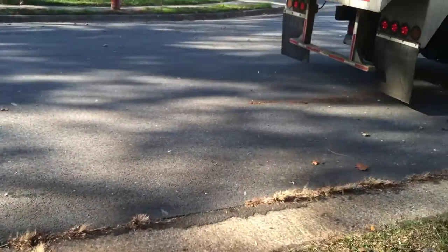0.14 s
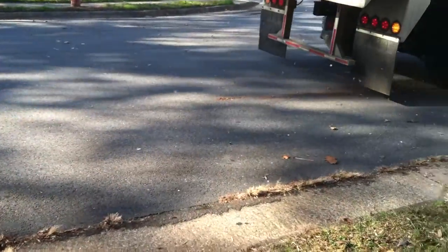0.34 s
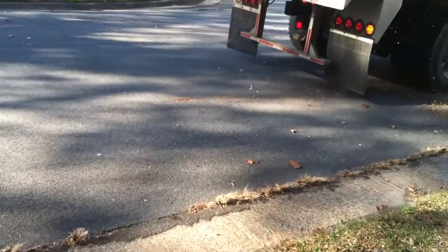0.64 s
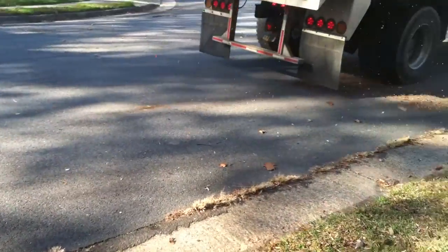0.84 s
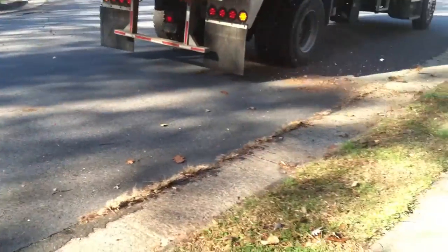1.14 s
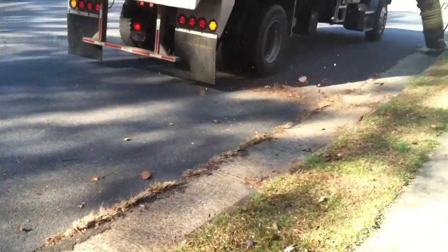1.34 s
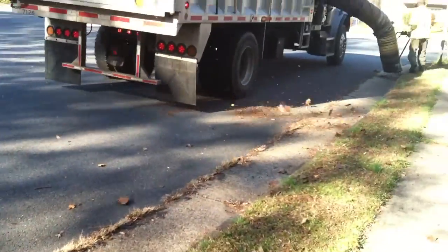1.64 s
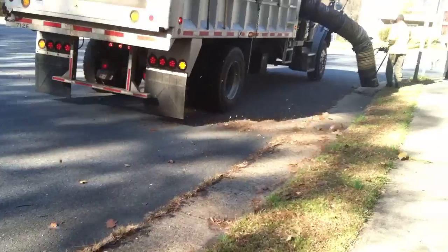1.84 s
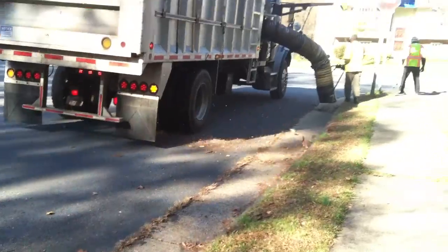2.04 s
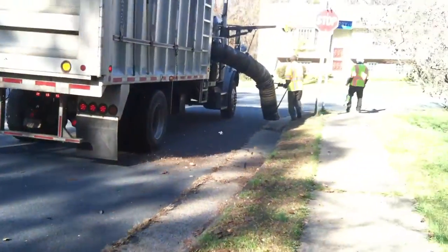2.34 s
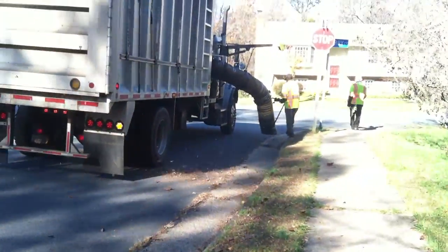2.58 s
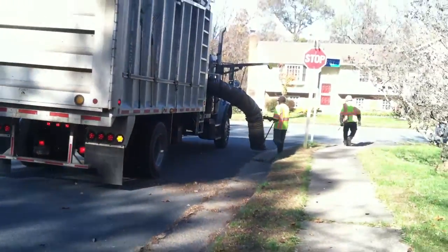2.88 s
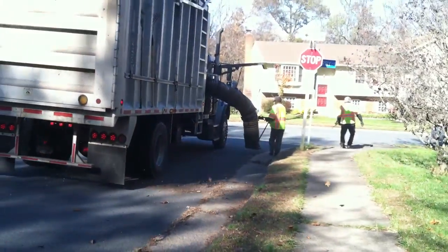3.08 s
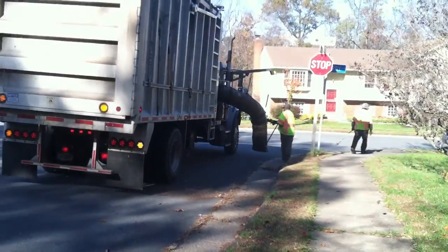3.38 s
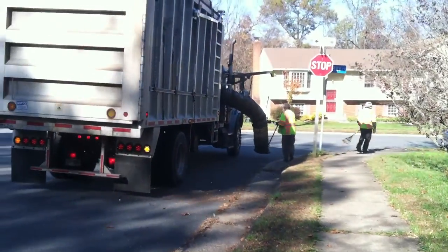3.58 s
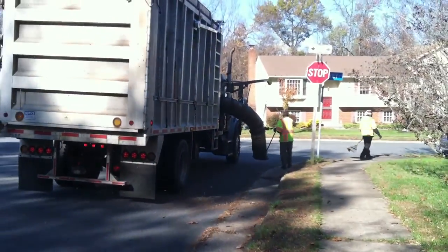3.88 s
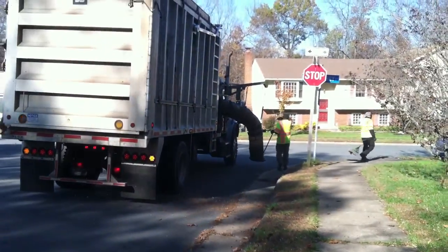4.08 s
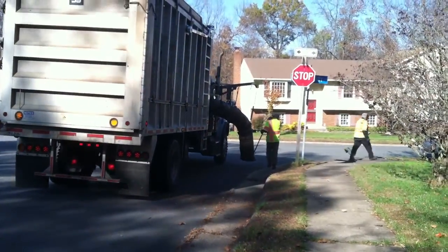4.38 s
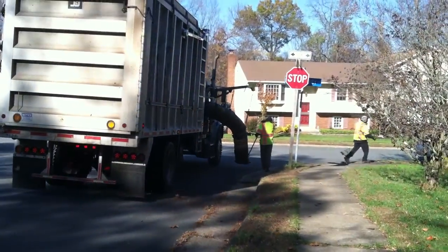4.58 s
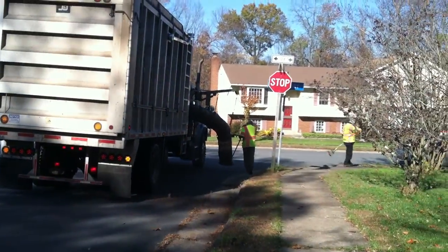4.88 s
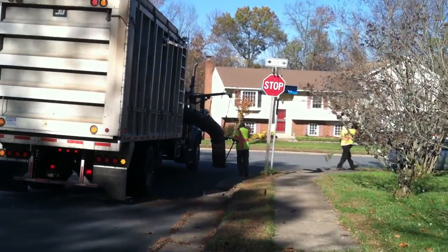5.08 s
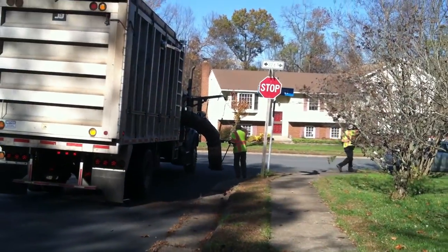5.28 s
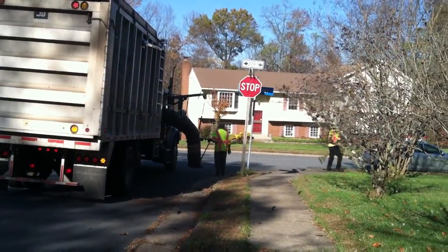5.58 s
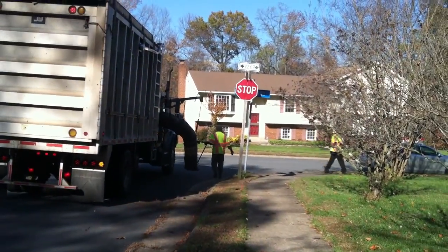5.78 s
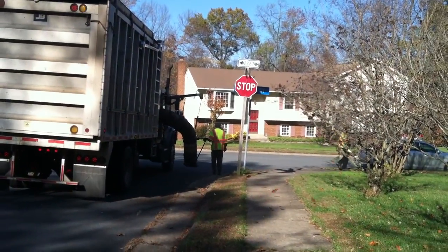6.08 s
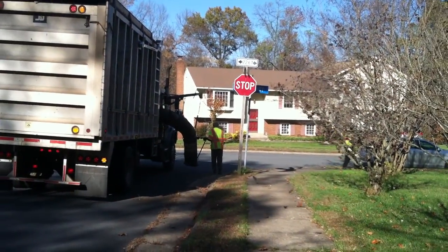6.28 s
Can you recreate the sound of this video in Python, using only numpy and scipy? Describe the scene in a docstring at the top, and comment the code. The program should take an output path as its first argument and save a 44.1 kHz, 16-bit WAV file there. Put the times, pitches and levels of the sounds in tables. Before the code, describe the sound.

The loud suction fan and diesel engine of a leaf vacuum truck hum and roar, easing slightly as it creeps away.

```python
"""At a street kerb, a truck-mounted leaf vacuum is at work. Six impeller blades chop the air into a
drone, the diesel fires at about a third of that pitch, turbulent air excites the resonances of hose
and box, and leaves hiss in bursts. Grit ticks on metal and a brake squeaks faintly. The listener
turns while the truck creeps away, so tones and resonances wax and wane."""
import sys
import numpy as np
from scipy import signal
from scipy.fft import rfft, irfft, next_fast_len
from scipy.io import wavfile
from scipy.ndimage import uniform_filter1d, map_coordinates

SR = 44100
rng = np.random.default_rng(int(sys.argv[2]) if len(sys.argv) > 2 else 0)


def int16_out(signal):
    """Quantize to a 16-bit WAV file."""
    q = np.round(np.clip(np.atleast_2d(signal).T, -1, 1) * 32767)
    wavfile.write(sys.argv[1], SR, q.astype(np.int16))


N = 283560
TIME = np.arange(N) / SR
FRAME = 1024


def amp(db):
    return 10 ** (np.asarray(db) / 20)


def unit(x):
    return x / np.sqrt(np.mean(x ** 2) + 1e-20)


def curves(rows, t=TIME):
    """Linear interpolation in time of each column after the first."""
    times, *columns = np.transpose(rows)
    return [np.interp(t, times, column) for column in columns]


def wobble(rate):
    """Smooth random modulation: a spline with rate knots a second."""
    coarse = np.arange(0, N + 64, 64)
    knots = rng.standard_normal(int(N * rate / SR) + 4)
    return np.interp(np.arange(N), coarse, map_coordinates(knots, [coarse * rate / SR]))


def peak(hz, centre, width):
    """Steep resonance curve, falling to a quarter at centre +/- width."""
    return 1 / (1 + ((hz - centre) / width) ** 2) ** 2


def filtered(x, gain):
    """Zero-phase filtering by gain(f); mirrored ends prevent clicks."""
    x = np.pad(x, [(0, 0)] * (x.ndim - 1) + [(FRAME, FRAME)], "reflect")
    size = next_fast_len(N + 4 * FRAME)
    return irfft(rfft(x, size) * gain(np.fft.rfftfreq(size, 1 / SR)), size)[..., FRAME:FRAME + N]


def rush(gain, patchy_db):
    """Turbulent noise of rms 1, shaped by gain(f, t), in patches of random strength."""
    hz, t, spectrum = signal.stft(rng.standard_normal(N), SR, nperseg=FRAME)
    patches = uniform_filter1d(rng.standard_normal(spectrum.shape), size=8, axis=0)
    patches = unit(uniform_filter1d(patches, size=6, axis=1))
    shaped = spectrum * gain(hz[:, None], t) * amp(patchy_db * patches)
    return unit(signal.istft(shaped, nperseg=FRAME)[1][:N])


def harmonics(hz, partials, drift_hz, waver_db):
    """Harmonic series of an unsteady rotation; each (harmonic, level/dB) wavers on its own."""
    phase = 2 * np.pi * np.cumsum(hz + drift_hz * wobble(1.66)) / SR
    return sum(np.sqrt(2) * amp(db + waver_db * (wobble(9) + 0.73 * wobble(35)))
               * np.sin(k * phase + rng.uniform(0, 2 * np.pi)) for k, db in partials)


def fading_db(depth_db=4, per_s=4.5):
    """Destructive interference: street echoes weaken a tone at random moments."""
    return -depth_db * wobble(per_s) ** 2


# The listener's turn: t/s, fraction completed
TURN_PROGRESS = [(.6, 0), (1.1, 0.12), (1.5, 0.38), (1.85, 0.66), (2.1, .88), (2.6, 0.98), (6.43, 1)]

def turned(before, after, t, lateness=1):
    """Interpolation along the turn; a lateness above 1 delays the change."""
    return before + (after - before) * np.clip(curves(TURN_PROGRESS, t)[0], 0, 1) ** lateness


# Low blade harmonics: t/s, level/dB of harmonics 1, 2 and 4
BLADE_LEVELS = [(0, -24, -39, -42), (.5, -23.5, -35, -41), (.75, -22.5, -36, -38), (1.1, -21.5, -39, -34),
                (1.4, -23.5, -42, -43), (1.8, -22, -40, -54), (2, -22, -30, -50), (2.2, -23, -28, -48),
                (2.35, -27, -44, -36), (2.6, -33, -29, -35), (2.85, -45, -28, -46), (3, -38, -31, -47),
                (3.15, -35, -26, -43), (3.3, -36, -23.5, -38), (3.45, -35, -26, -35), (3.6, -30, -30, -36),
                (3.75, -29, -30, -45), (4, -25, -34, -44), (4.35, -26, -32, -50), (4.6, -27, -31, -47),
                (4.9, -31, -34, -38), (5.25, -29, -33, -43), (5.45, -26, -32, -38), (5.8, -26.5, -37, -40),
                (6.1, -26, -32, -40), (6.43, -25.5, -37, -34)]
# Fading overtones: harmonic, level/dB before the turn, level/dB after
BLADE_OVERTONES = [(3, -38, -47), (5, -45, -44), (6, -43, -45), (7, -47, -47)]
# Brief swells of those overtones: harmonic, t/s, gain/dB
BLADE_SURGES = [(6, .35, 6), (5, .8, 8), (6, 2.15, 7), (5, 3.3, 5), (7, 4.05, 7), (6, 4.4, 2), (3, .35, 4),
                (3, 1.4, 8), (3, 2.08, 9), (3, 3.2, 3), (3, 6, 3), (6, 3.45, 5), (5, 5.1, 3)]
# Faint top overtones: harmonic, level/dB
BLADE_TOP = [(8, -55), (9, -58), (10, -62)]

def impeller(blade_hz=226.35, surge_s=0.19):
    """Periodic chopping of the air radiates harmonics of the blade-passing frequency."""
    first, second, fourth = curves(BLADE_LEVELS)
    upper = []
    for k, before, after in BLADE_OVERTONES:
        surge_db = sum(db * np.exp(-((TIME - at) / surge_s) ** 2)
                       for harmonic, at, db in BLADE_SURGES if harmonic == k)
        flutter_db = (0.5 - np.tanh(surge_db / 2)) * fading_db()
        upper.append((k, turned(before, after, TIME) + flutter_db + surge_db))
    partials = [(1, first), (2, second + 1.8 * wobble(14)), (4, fourth), *upper, *BLADE_TOP]
    return harmonics(blade_hz, partials, drift_hz=.06, waver_db=1.1)


# Exhaust overtones: t/s, level/dB of harmonics 2, 4 and 8
EXHAUST_LEVELS = [(0, -42, -34, -36), (.55, -33, -42, -43), (1.1, -35, -41, -39), (1.7, -36, -47, -46),
                  (2.3, -34, -50, -43), (3, -32, -46, -50), (3.6, -35, -46, -55), (4.9, -35, -41, -55),
                  (5.15, -44, -42, -55), (6.43, -45, -42, -58)]
# Weak exhaust overtone: harmonic, level/dB
EXHAUST_WEAK = [(5, -50)]

def diesel(firing_hz=75.7, fundamental_db=-47.2):
    """Periodic exhaust pulses radiate harmonics of the firing frequency."""
    seventh = -40.5 + fading_db()
    second, fourth, eighth = curves(EXHAUST_LEVELS)
    partials = [(1, fundamental_db), (2, second), (4, fourth), (7, seventh), (8, eighth), *EXHAUST_WEAK]
    return harmonics(firing_hz, partials, drift_hz=.03, waver_db=.4)


# Spectrum of the air rushing through the impeller: f/Hz, relative spectral level/dB
ROAR_SPECTRUM = [(45, -25), (95, -9), (140, 6), (200, 6.5), (265, 3), (320, -4), (520, -1), (700, -0.5),
                 (1400, 0), (2300, -5), (2700, -15.5), (3450, -19), (5000, -14.5), (6700, -19), (7700, -25),
                 (8900, -34.5), (12000, -35.5)]

def roar(start_db=-23, start_m=7.7, creep_m_per_s=0.99):
    """Turbulence radiates broadband noise, which weakens by spherical spreading as the truck recedes."""
    f, db = np.transpose(ROAR_SPECTRUM)
    air = rush(lambda hz, t: 1, patchy_db=0.93)
    broad = unit(filtered(air, lambda hz: amp(np.interp(np.log(hz + 1), np.log(f + 1), db))))
    spreading_db = 20 * np.log10(1 + creep_m_per_s * TIME / start_m)
    return amp(start_db - spreading_db) * broad


# Air modes of hose and box, each with one swell or dip:
# f/Hz, width/Hz, level/dB, swell/dB, t/s of the swell, its half length/s
DUCT_MODES = [(195.4, 34.4, -39, 10.5, 0.52, 2.67), (306, 66, -41, 14, 0.29, 0.86),
              (435, 90, -35.5, -19, 1.36, 0.44), (690, 140, -56.5, 25, 1.36, 0.33),
              (374, 36, -49, 16.5, 0.86, 0.49), (510, 83, -51, 17, 2.1, 1.05),
              (1365, 48, -56, 12, 5.1, 1.2), (1253, 39, -52, 14, 3.44, 0.27),
              (253, 28, -58.5, 28, 1.4, 1.6), (327, 14, -56.5, 17, 5.9, 0.87),
              (317, 20, -56, 14, 4.2, 0.59), (400, 35, -49.5, 8.5, 4.5, 1.1), (790, 98, -47.5, 7, 4, 1.1),
              (1013, 160, -57.5, 18.5, 0.33, 1.6)]
# A hollow resonance that sinks as the truck passes: t/s, f/Hz, level/dB
HOLLOW_GLIDE = [(.7, 710, -33), (1.3, 610, -32.5), (1.8, 660, -29), (2.13, 635, -31), (2.22, 510, -32),
                (2.35, 483, -28.5), (2.45, 453, -37), (2.8, 390, -36), (3.4, 400, -25), (3.8, 490, -35),
                (6.43, 496, -36)]

def ducts(throb_db=2, throbs_per_s=40):
    """Forced resonance: the flow excites the enclosed air, which throbs with the uneven load."""
    flow = rush(lambda hz, t: 1, patchy_db=0.93)
    ringing = np.zeros(N)
    for centre, width, db, swell_db, at, half_s in DUCT_MODES:
        level_db = db + swell_db * np.exp(-((TIME - at) / half_s) ** 2)
        level_db += 0.71 * wobble(4.24) + throb_db * wobble(throbs_per_s)
        ringing += amp(level_db) * unit(filtered(flow, lambda hz: peak(hz, centre, width)))
    hollow = rush(lambda hz, t: peak(hz, curves(HOLLOW_GLIDE, t)[0], width=95), patchy_db=-1.0)
    ringing += amp(curves(HOLLOW_GLIDE)[1]) * hollow
    # The ringing carries no deep bass: it falls away steeply below about 125 Hz.
    return filtered(ringing, lambda hz: 1 / np.sqrt(1 + (125 / (hz + 1)) ** 12))


# Low and high hiss bands: f/Hz before the turn, f/Hz after, width/Hz before, after, extra midway
LEAF_BANDS = [(4210, 5500, 1950, 2030, 0), (7400, 9700, 2700, 3000, 2500)]
# Hiss envelope: t/s, level/dB of the low band, level/dB of the high band
LEAF_LEVELS = [(0, -35.5, -42.5), (.3, -35, -42), (.47, -39.5, -45), (.58, -39, -49), (.62, -35.5, -45.5),
               (1.19, -38.5, -45.5), (1.8, -35.5, -43.5), (1.93, -36, -46.5), (2.1, -43, -49.5),
               (2.5, -44, -52.5), (2.57, -47.5, -57), (3.3, -47, -55), (3.7, -54, -60), (6.43, -55, -64)]
# Clumps of leaves: t/s, gain/dB of the low band, gain/dB of the high band
LEAF_CLUMPS = [(.01, -2, 4.4), (.63, 4.5, 5), (.78, 0, 5.2), (.9, 2, 4.4), (1.8, 1, 4.5), (2.35, 8, 6),
               (2.51, 5, 5.2), (3.37, 8, 1.5)]

def leaves(rise_s=0.018, fall_s=0.056):
    """Friction noise of leaves and grit in the hose, shadowed by the truck's body as it draws ahead."""
    def band(hz0, hz1, width0, width1, extra):
        return lambda hz, t: peak(hz, turned(hz0, hz1, t),
                                  turned(width0, width1, t) + extra * np.sin(turned(0, np.pi, t)))

    low_db, high_db = curves(LEAF_LEVELS)
    for at, low_gain_db, high_gain_db in LEAF_CLUMPS:
        burst = np.exp(-np.abs(TIME - at) / np.where(TIME < at, rise_s, fall_s))
        low_db += low_gain_db * burst
        high_db += high_gain_db * burst
    gusts_db = 0.64 * wobble(9.04) + .5 * wobble(28.3)
    low = rush(band(*LEAF_BANDS[0]), patchy_db=1.1)
    high = rush(band(*LEAF_BANDS[1]), patchy_db=1.2)
    return amp(low_db + gusts_db) * low + amp(high_db + 1.2 * gusts_db + 0.58 * wobble(22)) * high


# Grit striking metal: t/s, level/dB before filtering
GRIT_IMPACTS = [(.887, -41.5), (2.35, -47), (3.5, -49), (5.33, -46)]

def grit(rise_s=.003):
    """A brief impact has a broad spectrum: each tick is a soft, bright puff of noise."""
    ticks, t = np.zeros(N + SR), np.arange(FRAME) / SR
    envelope = t / rise_s * np.exp(1 - t / rise_s)
    for at, db in GRIT_IMPACTS:
        ticks[round(at * SR):][:FRAME] += amp(db) * envelope * rng.standard_normal(FRAME)
    return filtered(ticks[:N], lambda hz: peak(hz, centre=10000, width=5500))


# Brake squeaks: t/s, duration/s, f/Hz, level/dB
BRAKE_SQUEAKS = [(3, .03, 13050, -60), (4.78, .04, 8700, -59), (4.912, .075, 11760, -52),
                 (4.98, .045, 11810, -61), (5.96, .33, 8725, -61), (6.35, .08, 8725, -59)]

def brake():
    """Friction-excited vibration: each squeak is one thin tone with soft ends."""
    squeaks = np.zeros(N + SR)
    for at, length, hz, db in BRAKE_SQUEAKS:
        t = np.arange(round(length * SR)) / SR
        envelope = np.sin(np.pi * t / length) ** .3
        squeaks[round(at * SR):][:len(t)] += amp(db) * envelope * np.sin(2 * np.pi * hz * t)
    return squeaks[:N]


def scene():
    """Superposition of all sources in one channel."""
    return (impeller() + diesel() + roar() + ducts() + leaves() + grit() + brake())[None]


# Spectral dips: f/Hz before the turn, f/Hz after, depth/dB before, after, width/Hz, lateness of glide
HOUSING_DIPS = [(2830, 3500, 1, 5.5, 660, 4.5), (6500, 10000, 6, 5, 740, 0.9)]

def housing(x, midway_fill=0.35):
    """Diffraction round the microphone's housing cuts two dips, which partly fill in mid-turn."""
    hz, t, spectrum = signal.stft(x, SR, nperseg=FRAME, boundary="even")
    depth = 1 - midway_fill * np.sin(turned(0, np.pi, t))
    dips_db = sum(turned(db0, db1, t) * depth * peak(hz[:, None], turned(hz0, hz1, t, lateness), width)
                  for hz0, hz1, db0, db1, width, lateness in HOUSING_DIPS)
    return signal.istft(spectrum * amp(-dips_db), nperseg=FRAME)[1][..., :N]


def record(dry):
    """Low-pass: the top treble rolls off steeply above 12.4 kHz, with nothing above 15.6 kHz."""
    corner_hz, limit_hz = 12400, 15600
    return filtered(housing(dry), lambda hz: (hz < limit_hz) / np.sqrt(1 + (hz / corner_hz) ** 30))


dry = scene()
out = record(dry)
int16_out(out)
```